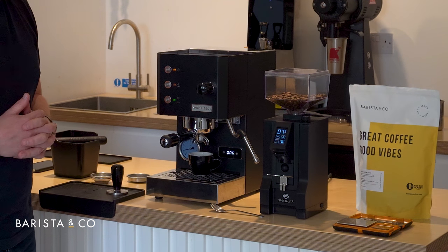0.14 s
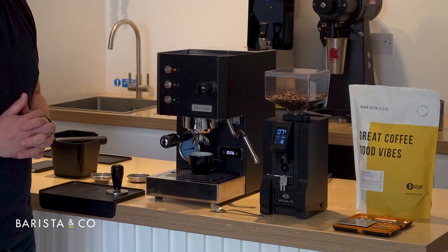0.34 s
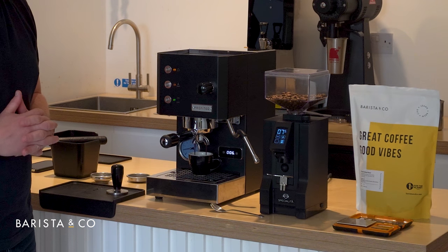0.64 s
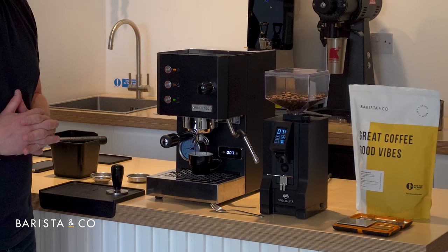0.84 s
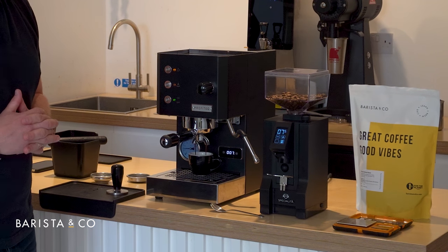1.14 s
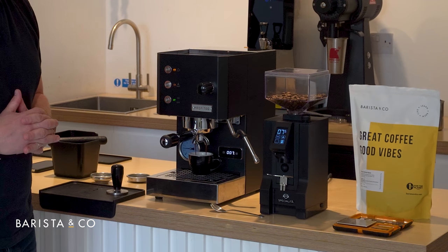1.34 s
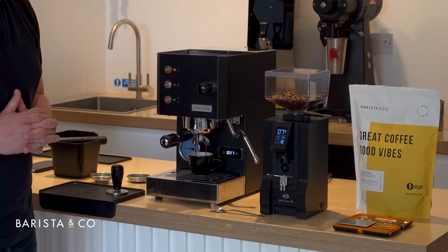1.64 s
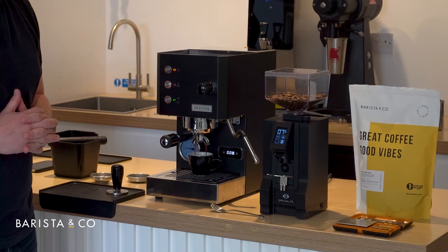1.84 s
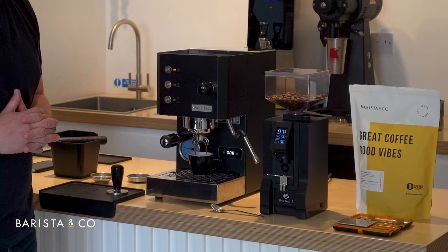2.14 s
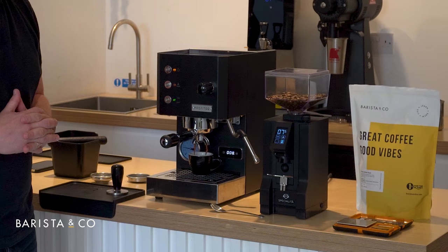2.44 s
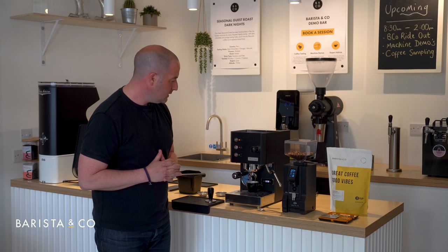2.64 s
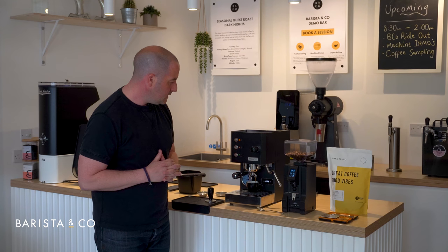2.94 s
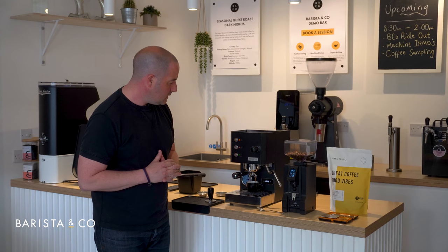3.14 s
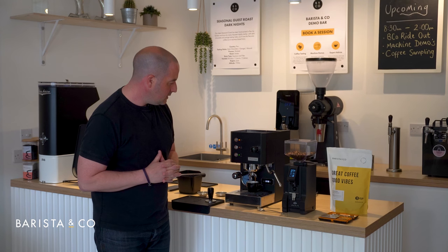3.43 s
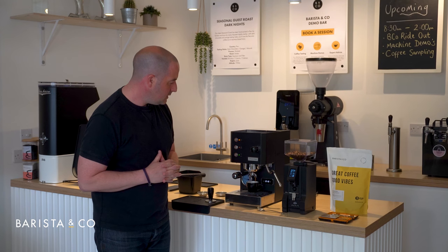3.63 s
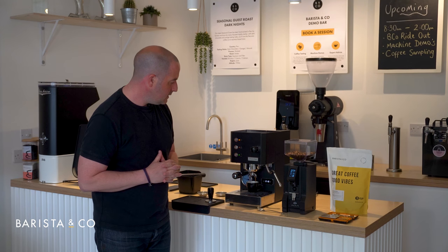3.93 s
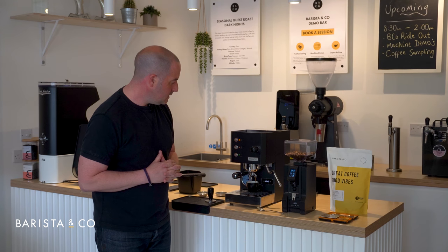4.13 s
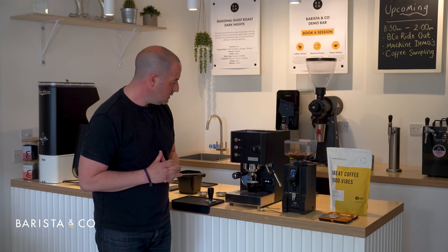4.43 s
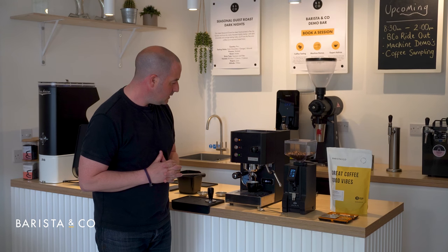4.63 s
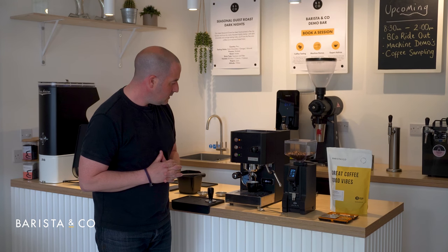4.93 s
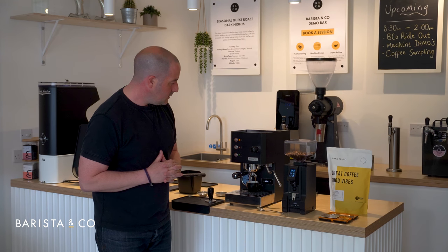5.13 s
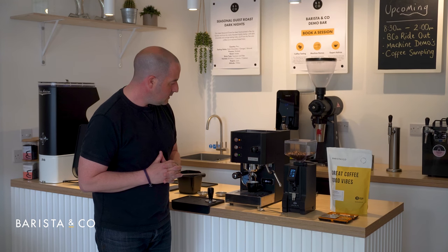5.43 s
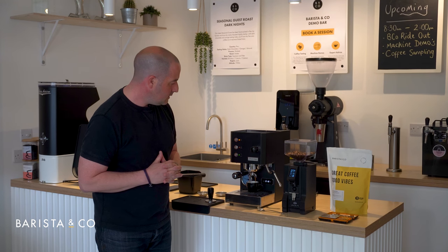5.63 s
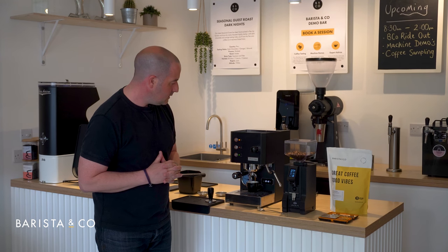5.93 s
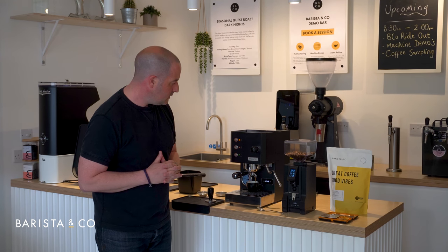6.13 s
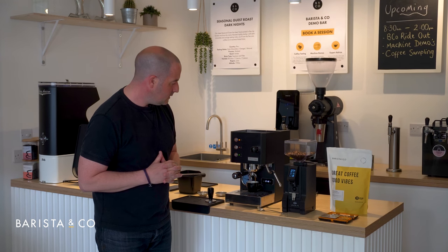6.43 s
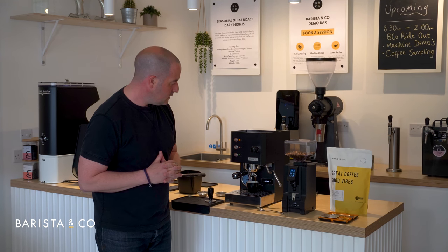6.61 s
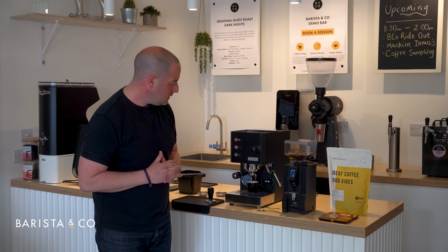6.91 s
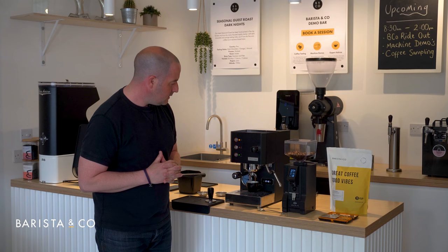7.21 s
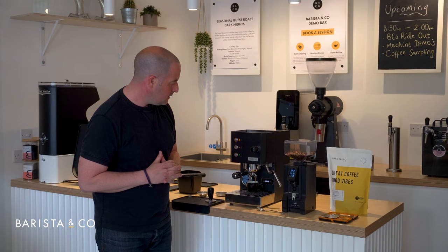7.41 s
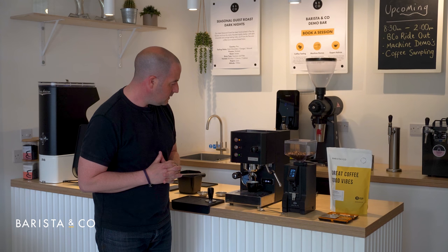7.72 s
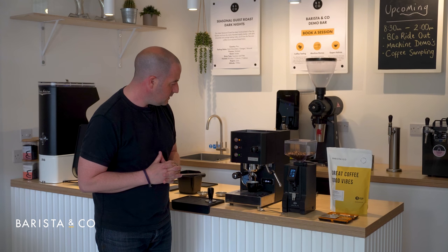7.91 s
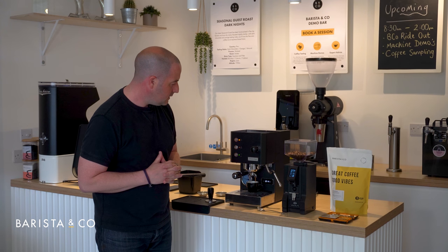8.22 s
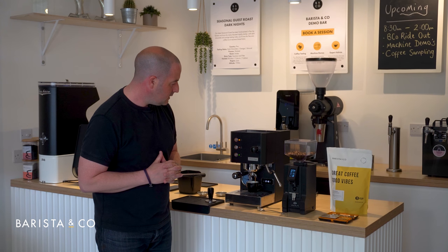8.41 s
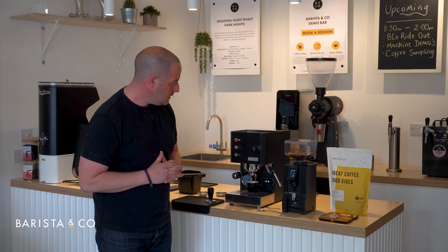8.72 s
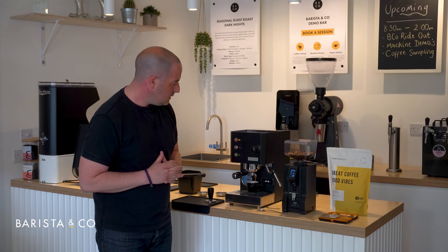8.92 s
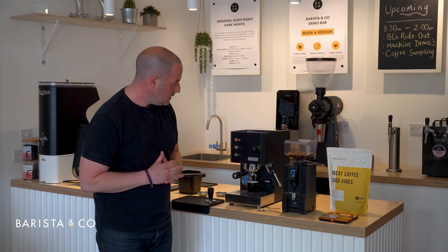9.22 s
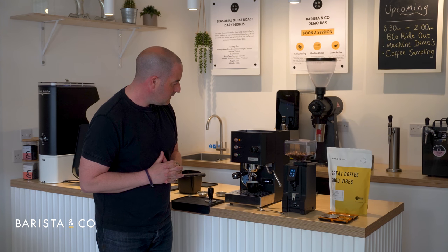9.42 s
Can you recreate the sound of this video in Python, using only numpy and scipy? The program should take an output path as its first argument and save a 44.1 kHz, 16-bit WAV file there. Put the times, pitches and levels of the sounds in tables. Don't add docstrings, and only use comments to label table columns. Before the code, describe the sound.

An espresso machine's vibratory pump buzzes steadily in a small room, uneven and rattly at first, then firmer, with bright coffee drops plinking into a cup.

```python
import sys
import numpy as np
from scipy import signal
from scipy.fft import rfft, irfft
from scipy.io import wavfile

SR = 44100
rng = np.random.default_rng(int(sys.argv[2]) if len(sys.argv) > 2 else 0)


def field_ratio(decibels):
    return 10 ** (np.asarray(decibels, dtype=float) / 20)


def wav_out(sig):
    wavfile.write(sys.argv[1], SR, np.round(np.clip(np.atleast_2d(sig).T, -1, 1) * 32767).astype(np.int16))


N = 421596
T = np.arange(N) / SR
SEATED_S = 5.2

# time_s, mains_hz
MAINS_HZ = [(0, 50.027), (4, 50.025), (6, 50.015), (9.6, 49.996)]
# time_s, coil_db, knock_db, looseness (0-1)
PUMP_STATE = [(0, -4.5, -16.5, 0.75), (.4, -3.5, -14.5, 0.83), (.65, -4.5, -9, 0.94), (.95, -4, -4, 0.86),
              (1.3, -3, -2.5, 0.06), (1.5, -2, -5.5, 0.84), (1.8, -2.5, -3.5, 0.55), (2.5, -1.5, -2, 0.32),
              (2.9, -.5, -1.5, 0.47), (3.2, -0.5, -0.5, 0), (4.1, .5, 0.5, 0.1), (5.3, 0.5, 0.5, 0.1),
              (6.6, 0, 0, 0.16), (7.4, 0, 0, 0.21), (8.7, 0, 0, 0.17), (9.05, -0.2, -2.5, 0.73),
              (9.3, 0.75, -3, 0.93), (9.56, -0.2, -1, 0.5)]
# middle_s, length_s, depth (0-1)
SEAT_SLIPS = [
    (1.15, 0.22, 0.7),
    (1.4, .24, 0.9),
    (2.72, .08, 0.1),
    (5.2, .08, 0.17),
    (6.88, 0.13, 0.3),
    (9.22, 0.071, 0.3),
]


def evened(x):
    return x / np.sqrt(np.mean(abs(x) ** 2) + 1e-20)


def curves(rows):
    time_s, *columns = np.transpose(rows)
    return [np.interp(T, time_s, column) for column in columns]


def bumps(rows):
    return sum(height * np.exp(-(2 * (T - s) / length) ** 2) for s, length, height in rows)


def read(points, hz):
    f, value = np.transpose(points)
    return np.interp(np.log(hz + 1), np.log(f + 1), value)


def coloured(x, points):
    gain = field_ratio(read(points, np.fft.rfftfreq(N, 1 / SR)))
    return evened(irfft(rfft(x) * gain, N))


def resonate(x, hz, width_hz):
    pole = np.exp(-np.pi * width_hz / SR) * np.exp(2j * np.pi * hz / SR)
    return evened(signal.lfilter([1], [1, -2 * pole, pole ** 2], x).real)


def slow(hz):
    count = int(N / SR * 2 * hz) + 2
    return evened(np.interp(T, np.linspace(0, N / SR, count), rng.standard_normal(count)))


def room(x, t60_s, wet):
    t = np.arange(SR // 4) / SR
    tail = rng.standard_normal(SR // 4) * field_ratio(-60 * t / t60_s)
    return evened(x + wet * signal.oaconvolve(x, tail / np.linalg.norm(tail))[:len(x)])


def cycles():
    first_knock_s = .0113
    return np.cumsum(curves(MAINS_HZ)[0]) / SR - first_knock_s * MAINS_HZ[0][1]


def strokes(size, delay_s, jitter_s):
    at = np.flatnonzero(np.diff(np.floor(cycles())))
    scatter_s = jitter_s * rng.standard_normal(len(at))
    at = at + ((delay_s + scatter_s) * SR).astype(int)
    out = np.zeros(N)
    np.add.at(out, np.clip(at, 0, N - 1), size[:len(at)])
    return out


def uneven(alternate):
    return evened(signal.lfilter([1], [1, np.clip(alternate, 0, .97)], rng.standard_normal(500)))


def looseness():
    return np.clip(curves(PUMP_STATE)[2] + 1.2 * bumps(SEAT_SLIPS), 0, 1)


def follow(seated_db, per_coil, per_knock, loose_db, slip_db, db_per_s):
    coil_db, knock_db, loose = curves(PUMP_STATE)
    pressure_s = np.maximum(T - SEATED_S, 0)
    drive_db = per_coil * coil_db + per_knock * knock_db
    return seated_db + drive_db + loose_db * loose + slip_db * bumps(SEAT_SLIPS) + db_per_s * pressure_s


def hum():
    # harmonic (multiple of mains), level_db
    order_db = [(1, -14.5), (2, -17), (3, -32), (4, 1.5), (5, -4), (6, -2), (7, -11), (8, -20.5), (9, -27),
                (10, -28), (11, -21.5), (12, -29), (13, -27.5), (14, -5), (15, 7), (16, -5), (17, -38),
                (18, -29), (19, -40), (20, -21.5), (21, -14), (22, -21.5), (23, -19.5), (24, -18.5),
                (25, -38), (26, -18), (27, -17.5), (28, -44), (29, -24.5), (30, -52), (31, -28),
                (32, -20.5), (33, -18), (34, -24), (35, -17.5), (36, -24)]
    # harmonic, slope_db_per_s
    drift_slopes = [(2, 0.84), (3, 1.5), (7, .6), (9, -0.7), (11, 0.95)]
    # seated_db, per_coil (dB/dB), per_knock (dB/dB), loose_db, slip_db, db_per_s
    fifth = (-34, .5, .5, -2.5, -10, -0.42)
    sixth = (-33, 0, 0.98, 0, -1.5, 0)
    casing_layer = (-36.5, 1, 0.43, -7.5, -4, -0.19)

    fifth_db, sixth_db, casing_db = follow(*fifth), follow(*sixth), follow(*casing_layer)
    turn, loose = np.exp(2j * np.pi * cycles()), looseness()
    drift, seated_db = dict(drift_slopes), dict(order_db)
    coil = field_ratio(-32 + curves(PUMP_STATE)[0] - seated_db[4])
    out, casing, spin = np.zeros(N, complex), np.zeros(N, complex), 1
    for k in range(1, 37):
        spin = spin * turn
        lined_up = k <= 7 or 14 <= k <= 16
        phase = 2 * np.pi * rng.random() * (not lined_up)
        phase += np.pi * (k < 4)
        phase -= 0.65 * (k in (6, 15))
        unrest = 0.011 * k ** .5 + 0.26 * loose ** 2 * (5 <= k <= 7)
        line = (1 + unrest * (slow(7) + 1j * slow(5.7))) * np.exp(1j * phase) * spin
        if k in (5, 6):
            out += field_ratio(fifth_db if k == 5 else sixth_db) * line
        elif 14 <= k <= 16:
            casing += field_ratio(seated_db[k]) * line
        elif k in drift:
            pressure_db = drift[k] * (T - 4.5)
            play_db = 1.9 * loose - 4.8 * bumps(SEAT_SLIPS)
            out += field_ratio(seated_db[k] - 32.5 + pressure_db + play_db) * line
        else:
            out += field_ratio(seated_db[k]) * coil * line
    mix = np.clip(0.85 * loose, 0, 1) ** 2
    smear = evened(slow(30) + 1j * slow(30))
    out += field_ratio(casing_db) * evened(casing) * (np.sqrt(1 - mix) + np.sqrt(mix) * smear)
    thuds = resonate(rng.standard_normal(N), 306.5, 92)
    return np.sqrt(2) * out.real + field_ratio(-42.5 - 6.8 * bumps(SEAT_SLIPS)) * loose * thuds


def fine_lines():
    # frequency_hz, level_db
    fine_envelope = [(1800, -60), (2500, -64), (3150, -62), (3400, -69), (4000, -71), (5000, -76)]

    turn, out = np.exp(2j * np.pi * cycles()), np.zeros(N)
    spin = turn ** 36
    for k in range(37, 100):
        spin = spin * turn
        db = read(fine_envelope, k * MAINS_HZ[0][1]) + 2.5 * rng.standard_normal()
        phase = 2 * np.pi * rng.random()
        out += field_ratio(db) * (1 + 0.24 * slow(3)) * (spin * np.exp(1j * phase)).real
    coil_db = curves(PUMP_STATE)[0]
    return np.sqrt(2) * field_ratio(1.74 * (coil_db - coil_db.max())) * out


def rattle():
    # frequency_hz, density_db (per Hz)
    wide_colour = [(60, 5), (150, 0), (450, 3), (900, 3.5), (1500, 7), (2500, 0.5), (4000, -4.5),
                   (5500, -8.5), (8000, -17), (10200, -23), (13000, -40), (15700, -56)]
    # frequency_hz, width_hz, level_db
    panel_modes = [(324.4, 41, -15), (605, 10, -23), (783.7, 61, -11.5), (996, 75, -19.5),
                   (1125, 140, -15.5), (1306, 69, -15), (1370, 29, -26.5), (1543, 45, -20),
                   (1746, 110, -22.5), (1992, 80, -16), (2163, 120, -16), (2413, 170, -20),
                   (3340, 360, -36), (4230, 190, -32), (4800, 80, -38), (5150, 340, -34), (6300, 330, -52)]
    # seated_db, per_coil (dB/dB), per_knock (dB/dB), loose_db, slip_db, db_per_s
    panel_layer = (-40, 0.31, 0.33, 0, -0.5, -0.12)
    tray_layer = (-46.5, 0, 0.5, 0, 2, 0)
    # middle_s, length_s, level_db
    stroke_runs = [(1.78, .2, -47), (2.202, 0.22, -48), (2.9, 0.51, -44), (3.25, .15, -49), (3.83, .2, -48),
                   (4.1, .12, -45), (4.56, 0.32, -41.5), (4.98, .15, -46), (5.24, 0.18, -39),
                   (5.56, 0.32, -41.5), (5.9, 0.14, -43), (6.28, .25, -44), (6.79, .14, -43),
                   (7.097, 0.27, -42), (7.45, .14, -46), (7.798, .35, -41.5), (8.15, 0.13, -45),
                   (8.52, .2, -45), (9.27, .2, -45)]
    # middle_s, length_s, change_db
    tray_bursts = [(1.15, .2, 2), (1.9, 0.61, 6), (2.5, .3, 0), (3.6, .4, 0), (4.25, .2, 1.5),
                   (4.9, 0.36, -3), (5.2, .12, 3), (6.5, .4, 0), (6.8, 0.092, 4), (6.97, .1, 5),
                   (7.6, 0.092, 6), (7.8, 0.16, 5), (8.25, .12, 4), (8.75, 0.44, -4), (9.25, .15, -1),
                   (9.39, .1, 5)]

    run_level = field_ratio(-56) + bumps([(s, length, field_ratio(db)) for s, length, db in stroke_runs])
    beat = 1 + 0.19 * np.cos(2 * np.pi * (cycles() - .15)) + 0.084 * np.cos(4 * np.pi * (cycles() - .1))
    chatter = rng.standard_normal(N) * beat * field_ratio(0.41 * slow(25))
    forward = evened(strokes(uneven(0.805), 0.001995, 0.00021))
    back = evened(strokes(uneven(0.874), .013, .0002))
    drive = 0.9 * room(forward + 0.89 * back, 0.3, 1.34) + chatter
    panels = sum(field_ratio(db) * resonate(drive, hz, 1.32 * width) for hz, width, db in panel_modes)
    wash = coloured(room(chatter, 0.22, 0.35), wide_colour)
    wide = field_ratio(follow(*panel_layer) + 0.45 * slow(4)) * (field_ratio(0.5) * wash + field_ratio(2.5) * panels)
    half = np.cos(2 * np.pi * 24.5 * cycles() + .8 * slow(5))
    half += .35 * np.cos(2 * np.pi * 15.5 * cycles() + slow(5))
    tray = field_ratio(follow(*tray_layer) + bumps(tray_bursts)) * resonate(drive, 1631, 26.0)
    return wide + field_ratio(2.0) * run_level * half + tray


def rumble():
    # frequency_hz, density_db (per Hz)
    rumble_colour = [(8, -14), (18, 1), (30, 4), (42, -5), (75, -2), (130, -16), (300, -33), (1200, -96)]

    lumps = field_ratio(-60.5 + 5.5 * slow(1.5)) * coloured(rng.standard_normal(N), rumble_colour)
    return lumps + field_ratio(-77) * rng.standard_normal(N)


def valve():
    # frequency_hz, width_hz, level_db
    metal_modes = [(6680, 400, 4.5), (7120, 120, -3), (8300, 140, -2), (9380, 300, 2), (9940, 130, -16),
                   (11100, 180, -9), (11330, 150, -8.5), (12600, 500, -12), (13600, 350, -17)]
    # start_s, peak_db
    hard_ticks = [(0.0907, -52), (0.1301, -50), (0.1705, -47), (0.2518, -51), (0.4698, -55), (0.5302, -52),
                  (0.61, -53), (0.6499, -52), (0.6908, -55), (0.7307, -56), (0.9093, -51), (1.1308, -60),
                  (1.4107, -59), (1.5499, -60), (1.5898, -58), (1.7305, -54), (2.2643, -54), (2.6234, -55),
                  (2.7038, -55), (3.7494, -54), (3.9893, -55), (4.0297, -54), (4.2093, -54), (4.6892, -55),
                  (6.8089, -56), (8.2477, -56), (8.4287, -56), (8.5684, -53)]
    # seated_db, per_coil (dB/dB), per_knock (dB/dB), loose_db, slip_db, db_per_s
    tick_layer = (-69, -1.4, 1, -2, -6, 0.7)
    # middle_s, length_s, change_db
    busy_spells = [
        (2.6, .5, 0),
        (3.2, .6, -1),
        (4.3, 1.3, 4.5),
        (5.6, 0.53, 1),
        (6.4, 1.2, 1.5),
        (8.5, .5, 0),
        (9.3, .7, -2),
    ]

    between = strokes(field_ratio(2.5 * uneven(.1)), .013, .0006)
    soft = evened(strokes(np.ones(500), .0003, .0003) + .5 * between)
    size = uneven(.7)[np.clip(cycles() + .5, 0, 499).astype(int)]
    spread_db = (2 + 2.5 * looseness() * (T < SEATED_S)) * np.minimum(size, 1.5)
    clicks = field_ratio(follow(*tick_layer) + bumps(busy_spells) + spread_db) * soft
    start_s, peak_db = np.transpose(hard_ticks)
    clicks[(start_s * SR).astype(int) + 10] += field_ratio(peak_db + 16.0)
    t = np.arange(3000) / SR
    meeting = t * field_ratio(-60 * t / 0.0094)
    contact = signal.oaconvolve(clicks, meeting / np.linalg.norm(meeting))[:N]
    clicks = rng.standard_normal(N) * contact
    blow = 1. * (t == 0)
    ring = sum(field_ratio(db) * resonate(blow, hz, width) for hz, width, db in metal_modes)
    tick = evened(ring) + field_ratio(-4.5) * resonate(blow, 12300, 3000)
    wash = rng.standard_normal(N) * signal.oaconvolve(abs(clicks), field_ratio(-60 * t / 0.083))[:N]
    return signal.oaconvolve(clicks + 0.0028 * wash, tick / np.linalg.norm(tick))[:N]


def drops():
    # start_s, peak_db, pitch_hz
    cup_drops = [(0.8175, -30, 6070), (2.3994, -27, 4710), (2.9083, -24, 4720), (2.9991, -35, 4460),
                 (3.4694, -31, 4700), (3.7858, -22, 4550), (4.037, -20, 4550), (4.0951, -28, 4500),
                 (4.1574, -21, 4600), (4.4897, -25, 4720), (6.0706, -34, 4800), (6.4682, -34, 4740),
                 (6.9456, -24, 4450), (7.0693, -42, 4450), (8.1409, -24, 4760)]
    # start_s, peak_db, pitch_hz
    tray_drop = [
        (6.7111, -17, 2430),
    ]

    t, out = np.arange(2600) / SR, np.zeros(N + 2600)
    decay = field_ratio(-60 * t / 0.008) + .04 * field_ratio(-60 * t / .1)
    shape = (1 - np.exp(-t / 0.00049)) * decay
    rise_s = .98 * t + .07 * (t - 0.0034 * (1 - np.exp(-t / 0.0033)))
    for start_s, peak_db, pitch_hz in [*cup_drops, *tray_drop]:
        plink = shape * np.sin(2 * np.pi * pitch_hz * rise_s)
        out[round(start_s * SR):][:2600] += field_ratio(peak_db - 5.5) * plink
    return out[:N]


def scene():
    return (hum() + fine_lines() + rattle() + rumble() + valve() + drops())[None]


def band_limit(x):
    return signal.sosfilt(signal.butter(12, 15730, fs=SR, output="sos"), x)


def record(dry):
    edge = signal.firwin(511, 15900, window=("kaiser", 9), fs=SR)
    mix = signal.oaconvolve(dry, edge[None], "same")
    return band_limit(mix)


dry = scene()
out = record(dry)
wav_out(out)
```